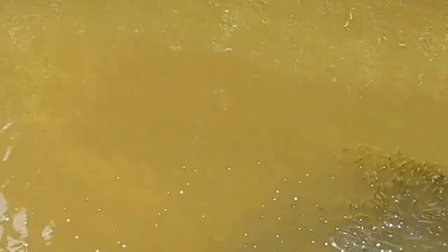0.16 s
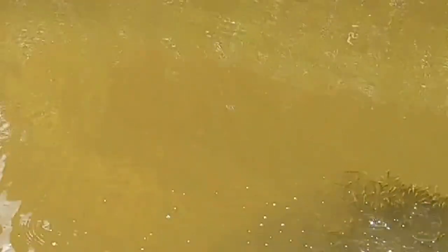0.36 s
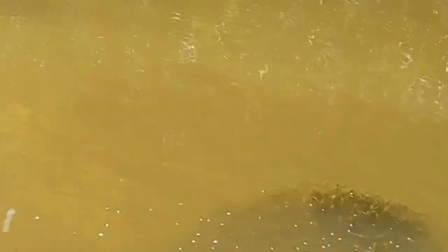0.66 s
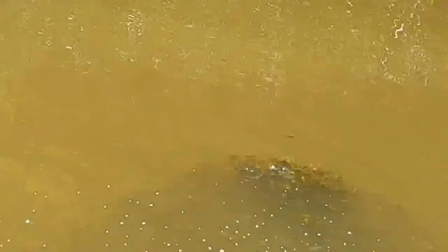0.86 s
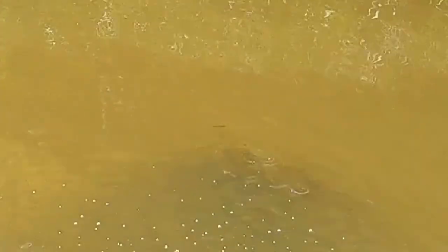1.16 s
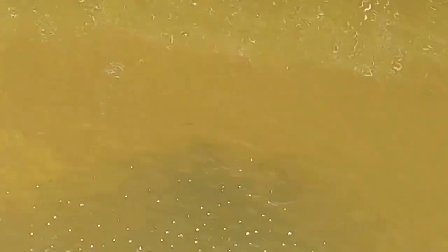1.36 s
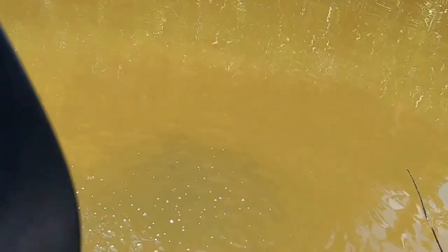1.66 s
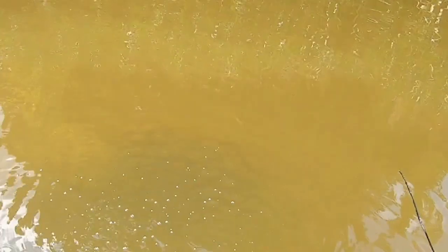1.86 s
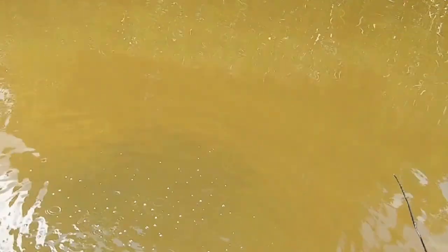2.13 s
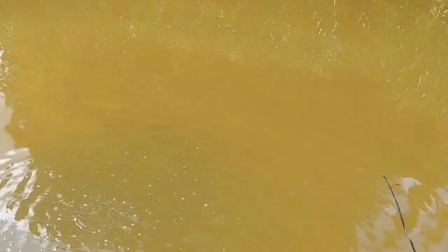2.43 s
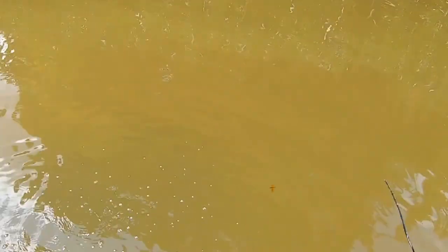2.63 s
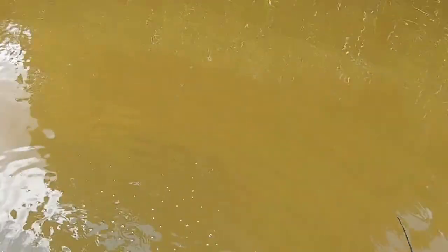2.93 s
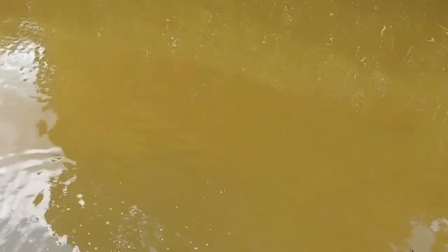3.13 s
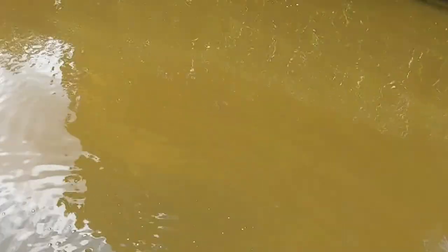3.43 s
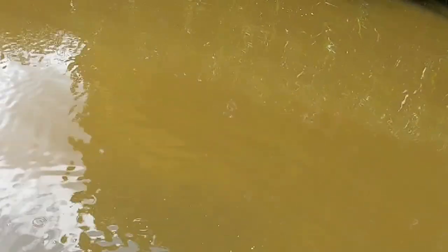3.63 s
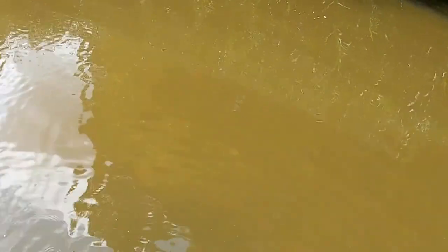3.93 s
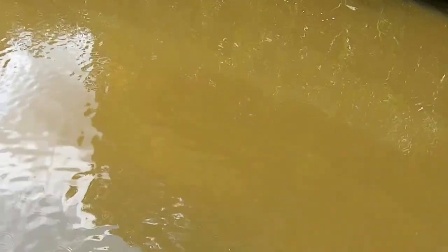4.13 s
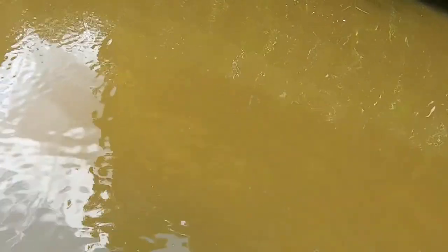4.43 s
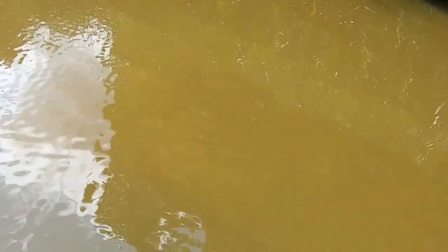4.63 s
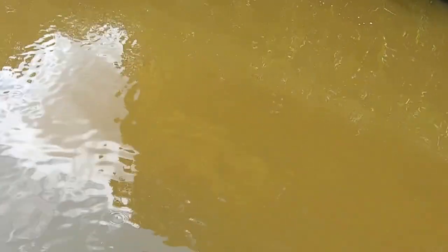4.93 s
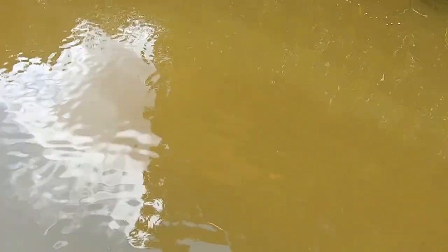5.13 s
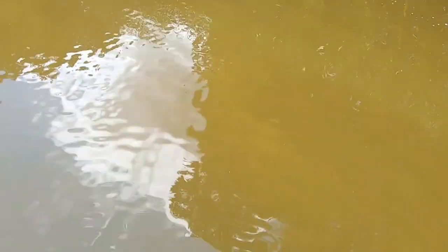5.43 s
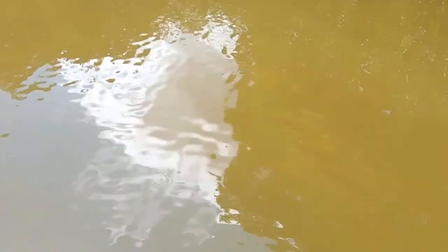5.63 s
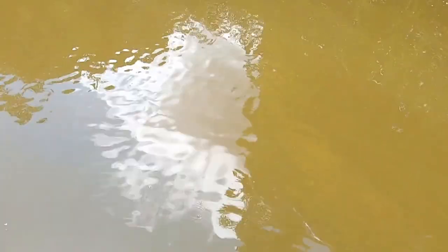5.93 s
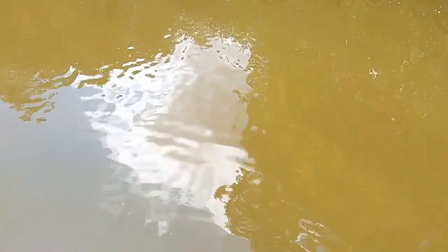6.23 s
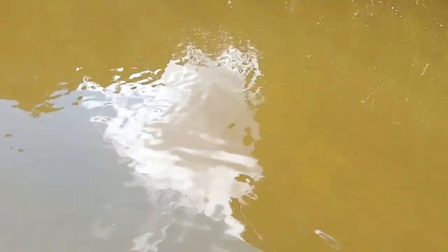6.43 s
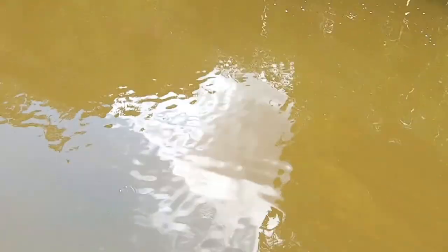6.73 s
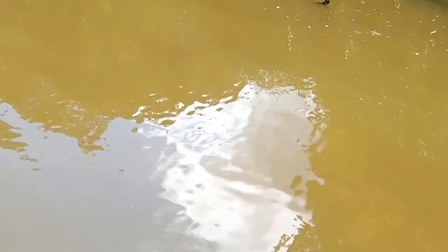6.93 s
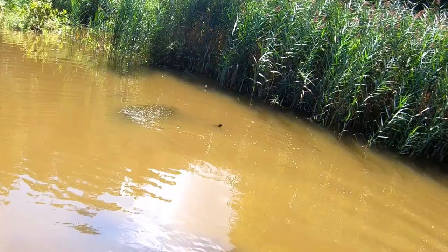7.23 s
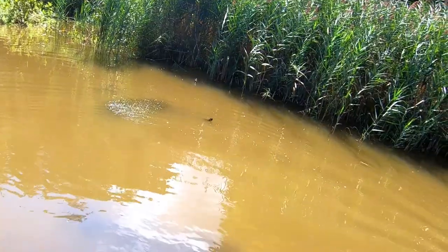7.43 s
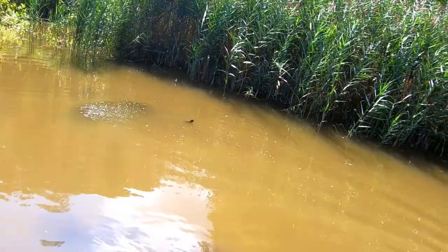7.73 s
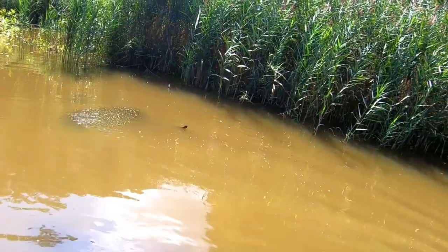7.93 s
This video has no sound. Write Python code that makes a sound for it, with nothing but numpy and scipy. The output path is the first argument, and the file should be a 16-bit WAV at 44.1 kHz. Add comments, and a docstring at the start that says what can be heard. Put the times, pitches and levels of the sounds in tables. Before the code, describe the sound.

Heard from aboard a small aluminium boat on a still pond. Wind rumbles low in the microphones over a steady high hiss and crickets on the right. A paddle knocks the hollow hull, hardest in a cluster around the middle, with a scrape, soft booms and plopping drops. A bright splash of drips follows, then two or three last thumps. At a final cut the insects jump up and the rumble falls away.

```python
"""Drifting boat beside reeds

A small aluminium boat on a still pond, heard in stereo from on board: a paddle knocks and drags on the hull,
whose modes ring; drops and bubbles plop as short rising sines. Shaped noise makes the wind rumbling in
the microphones and their steady high hiss, the lapping, the reeds, the insects and the flexing hull's booms;
pulsed whistles make the crickets on the right. Near the end it cuts to a view of the reeds: the insects are
suddenly louder, the lapping quieter.
"""
import sys
import numpy as np
from scipy import signal
from scipy.io import wavfile
from scipy.ndimage import uniform_filter1d

SR = 44100
rng = np.random.default_rng(int(sys.argv[2]) if len(sys.argv) > 2 else 0)


def log_audio(samples):
    """Write samples as a 16-bit WAV file to the path given in sys.argv[1]."""
    # one column per channel
    frames = np.atleast_2d(samples).T
    # limit to full scale, then quantise
    limited = np.clip(frames, -1, 1)
    pcm = np.round(limited * 32767).astype(np.int16)
    wavfile.write(sys.argv[1], SR, pcm)


N = 355887

CUT_S = 7.135  # cut to the view of the reeds: insects suddenly louder, lapping quieter


def gain_of(db):
    """Amplitude factor of a level in dB."""
    return 10 ** (np.asarray(db) / 20)


def evened(x):
    """The signal at unit rms."""
    return x / np.sqrt(np.mean(x ** 2) + 1e-20)


def read(hz, points, values):
    """Values between points on a log-frequency axis."""
    return np.interp(np.log(hz + 1), np.log(np.asarray(points) + 1), values)


def curve(rows, column):
    """One column of a time table at every sample."""
    rows = np.asarray(rows)
    return np.interp(np.arange(N) / SR, rows[:, 0], rows[:, column])


def add(mix, s, sound):
    """Lay a sound into the mix from s seconds on, cut at the end."""
    part = mix[:, round(s * SR):][:, :sound.shape[1]]
    part += sound[:, :part.shape[1]]


def sides(pan_db):
    """Left and right gains for a left-minus-right difference in dB."""
    return gain_of(np.array([.5 * pan_db, -.5 * pan_db]))


def hiss(table, patchy_db, size=1024, wide=9, long=9):
    """Two-sided noise with patches of wide bins by long frames; the mean of both sides has unit rms."""
    hop, hz = size // 4, np.fft.rfftfreq(size, 1 / SR)
    a, b, c, d, patches = rng.standard_normal((N // hop + 5, len(hz), 5)).T
    patches = uniform_filter1d(patches, int(wide), axis=0)
    patches = evened(uniform_filter1d(patches, int(long), axis=1))
    points, left_db, right_db, like = np.transpose(table)
    # the right side shares part of the left side's noise
    like = np.clip(read(hz, points, like), -1, 1)[:, None]
    left = a + 1j * b
    right = like * left + np.sqrt(1 - like ** 2) * (c + 1j * d)
    shape_db = np.array([read(hz, points, left_db), read(hz, points, right_db)])
    shape_db[:, (hz < points[0]) | (hz > points[-1])] = -120
    spectrum = np.array([left, right]) * gain_of(shape_db[:, :, None] + patchy_db * patches)
    x = signal.istft(spectrum, nperseg=size, noverlap=size - hop)[1][:, :N]
    return x / np.sqrt(np.mean(x.mean(0) ** 2))


# steady high hiss of the microphones, relative: (f/Hz, left level/dB, right level/dB, left-right likeness)
MICROPHONE_SPECTRUM = [(8830, -13, -5, 0.76), (9940, -6, -5, 1), (11100, -10, -11, 1),
                       (12300, -10.5, -7.5, 1), (13600, -6.5, -5, 1), (14000, -8, -15, 1),
                       (15450, -29, -14, 1), (16900, -37, -40, 0.82)]


def microphone_hiss():
    """Steady high noise of the microphones, largely shared by both sides."""
    return gain_of(-70.5) * hiss(MICROPHONE_SPECTRUM, patchy_db=1.0, size=512, wide=11, long=24)


# wind at the microphones, relative spectrum: (f/Hz, left level/dB, right level/dB, left-right likeness)
WIND_SPECTRUM = [(8.05, -12, -5, 0.11), (20.8, -9.5, -3, 0.14), (33.6, -15.5, -1, 0.043),
                 (47.6, -16.5, -10.5, 0.032), (55, -17.5, -19.5, 0.067), (71.6, -45, -37, .05),
                 (120, -68, -50, .05), (201, -85, -70, .05)]
# gusts at the microphones: (t/s, level/dB)
WIND_GUSTS = [(0, -54.5), (.6, -50.5), (1.9, -52), (2.45, -54.5), (3.1, -52), (3.4, -42), (3.56, -42),
              (3.75, -50.5), (4.05, -48), (4.35, -58.5), (5.0, -50.5), (5.9, -45.5), (6.05, -49),
              (7.0, -49.5), (7.2, -59.5), (7.45, -67), (7.6, -67), (8.07, -68)]
WIND_PAN_DB, WIND_SWAY_DB = -1.0, 2.5  # left minus right, and the rms of its wandering


def wind():
    """Low noise, nearly independent at each microphone, swells in gusts and sways between the sides."""
    sway = uniform_filter1d(rng.standard_normal(N), size=9000)
    sway = evened(uniform_filter1d(sway, size=9000))
    gusts = gain_of(curve(WIND_GUSTS, column=1))
    return hiss(WIND_SPECTRUM, patchy_db=1.5, size=4096) * gusts * sides(WIND_PAN_DB + WIND_SWAY_DB * sway)


# reeds beside the boat, relative spectrum: (f/Hz, left level/dB, right level/dB, left-right likeness)
REED_SPECTRUM = [(250, -60, -37, .05), (383, -4.5, -6, 0.48), (545, -9, -3.5, -0.6),
                 (804, -1.5, 2.5, -0.56), (1030, -5.5, -6.5, -0.44), (1370, -8, 0.5, -0.25),
                 (1500, -2.5, -10.5, 0.11), (1660, -8, 1.5, -0.3), (2090, -10.5, -8.5, 0.013),
                 (2660, -9, -10.5, 0.12)]
# rustle of the reeds: (t/s, level/dB)
REED_LEVELS = [(0, -79), (1.4, -75), (2.5, -74.5), (3.15, -68), (3.65, -66.5), (4.1, -71), (4.65, -71),
               (4.75, -81.5), (4.85, -69), (5.03, -65), (5.17, -62.5), (5.35, -71), (5.75, -75), (6.4, -69),
               (6.9, -72), (7.15, -70.5), (7.5, -64.5), (8.07, -70.5)]


def reeds():
    """Patchy middle-band noise rises and falls as the reeds rustle."""
    return hiss(REED_SPECTRUM, patchy_db=3.0) * gain_of(curve(REED_LEVELS, column=1))


# crickets on the right: (t/s, length/s, f/Hz, level/dB before fades and panning, nearness 0-1)
CRICKET_SONGS = [(0, 3.1, 8430, -74, .3), (.7, 1.4, 8010, -68, .2), (2.15, 1.35, 7810, -68, .2),
                 (2.2, 1.4, 8040, -70, .2), (3.85, 1.25, 8400, -67, .75), (5.15, 1.8, 8390, -68, .75),
                 (5.2, 1.0, 8010, -69, .2), (5.8, 1.3, 7800, -69, .2), (6.35, .75, 7160, -69, .02),
                 (7.1, 1.2, 8180, -65, .1)]


def crickets(beat):
    """Narrow whistles: the farther, the fuzzier; the nearer, the cleaner and more strongly pulsed."""
    out = np.zeros((1, N))
    for s, length, hz, level_db, near in CRICKET_SONGS:
        pulses = beat[round(s * SR):][:round(length * SR)]
        near = np.clip(near, 0, 1)
        noise = rng.standard_normal((2, len(pulses)))
        fuzz = evened(signal.lfilter([1], [1, -np.exp(-np.pi * 45.0 / SR)], noise))
        envelope = near + (1 - near) * (fuzz[0] + 1j * fuzz[1])
        whistle = (envelope * np.exp(2j * np.pi * hz * np.arange(len(pulses)) / SR)).real
        song = evened(whistle * np.exp(1.6 * near * pulses)) * signal.windows.tukey(len(pulses), .3)
        add(out, s, gain_of(level_db) * song[None])
    return out * np.array([[.25], [1.75]])  # left, right


# insect chorus in the reeds, relative spectrum: (f/Hz, left level/dB, right level/dB, left-right likeness)
CHORUS_SPECTRUM = [(2060, -24, -28, 0.22), (2680, -26.5, -20.5, 0.95), (3240, -12.5, -14, 0.67),
                   (4430, -18, -15, 0.47), (5950, -14, -8.5, 0.1), (6830, -11, -5.5, 0.69),
                   (6980, -9, -7.5, -0.47), (7410, -16.5, -2, 0.29), (8150, -19, 1.5, -0.42),
                   (8500, -15, -4.5, -0.97), (8660, -34, -8.5, -0.49), (8990, -20, -14, 0.4),
                   (10170, -40.5, -22, 0.89), (12200, -23, -38, 0.67)]
# shrill lower insects, relative spectrum: (f/Hz, left level/dB, right level/dB, left-right likeness)
SHRILL_SPECTRUM = [(2180, -32, -30, 0.28), (2560, -8.5, -9.5, 0.35), (2900, 1, -5.5, 0.27),
                   (2970, -13, -12, 0.67), (3270, -20, -42, 0.4)]
# low insect bands: (t/s, low chorus level/dB against its top before the cut's lift, shrill level/dB)
LOW_INSECTS = [(0, 6, -84), (2.2, -5.5, -85), (3.3, -3, -83), (4.8, -6, -79), (5.2, -2, -74),
               (7.1, -4.5, -73.5), (8.07, -7, -74.5)]
CHORUS_DB, SWELL_DB_PER_S = -61, 0.6965  # the chorus grows as the boat drifts toward the reeds
CUT_DB, CUT_LOW_DB = 3.5, 6.5  # at the cut: lift of the chorus, extra lift of its low band


def insects():
    """A broad chorus that throbs a little, a shrill lower band and crickets."""
    t = np.arange(N) / SR
    after_cut = np.clip((t - CUT_S) / 0.013, 0, 1)
    wobble = evened(uniform_filter1d(rng.standard_normal(N), size=8000))
    beat = np.cos(2 * np.pi * np.cumsum(40.0 + .5 * wobble) / SR)  # about 40 throbs a second
    chorus = hiss(CHORUS_SPECTRUM, patchy_db=1.6, wide=2, long=120)
    low = signal.sosfiltfilt(signal.butter(3, 4300, fs=SR, output="sos"), chorus)
    low_gain = gain_of(curve(LOW_INSECTS, column=1) + CUT_LOW_DB * after_cut)
    chorus = (chorus - low) * (1 + 0.02 * beat) + low * low_gain
    chorus *= gain_of(CHORUS_DB + SWELL_DB_PER_S * t + CUT_DB * after_cut)
    shrill = gain_of(curve(LOW_INSECTS, column=2)) * hiss(SHRILL_SPECTRUM, patchy_db=2.5, size=512)
    return chorus + shrill + crickets(beat)


# hull booms, relative spectrum: (f/Hz, left level/dB, right level/dB, left-right likeness)
BOOM_SPECTRUM = [(35.2, -18, 3, 0.81), (55, -19, 12, 0.34), (80, 9, -7, 0.98), (109, -6, -3.5, 0.98),
                 (153, -31, -15, 0.77)]
# the hull flexes as weight shifts: (peak t/s, level/dB, rise/s, fall/s)
HULL_FLEXES = [(.05, -61.5, .1, 0.46), (2.108, -46.5, 0.11, 0.12), (2.898, -47, 0.36, 0.13),
               (3.55, -43, .06, 0.57), (3.76, -47.5, 0.14, 0.042), (5.168, -46.5, 0.14, 0.41),
               (6.066, -55, .06, 0.047), (6.95, -61.5, 0.47, 0.22)]
FAR_DB = -27  # how far a boom lies under its peak one rise before and one fall after


def rocking():
    """Soft low booms swell and sink, largely shared by both microphones."""
    t = np.arange(N) / SR
    swell = np.zeros(N)
    for s, db, rise, fall in HULL_FLEXES:
        swell += gain_of(db + FAR_DB * np.maximum((s - t) / rise, (t - s) / fall))
    return hiss(BOOM_SPECTRUM, patchy_db=2.0, size=2048) * swell


# small drips run off the paddle: (from t/s, to t/s, top level/dB)
DRIP_RUNS = [(3.76, 4.06, -52), (5.15, 5.24, -54), (5.45, 5.56, -54), (6.83, 6.9, -59)]


def drips():
    """Rows like those of PLOPS, drawn at random: about 130 tiny plips a second."""
    rows = []
    for start, end, level_db in DRIP_RUNS:
        for u in rng.random((int(130 * (end - start)), 4)):
            s = start + u[0] * (end - start)
            rows.append((s, level_db - 20.0 * u[1], 900 * 3.02 ** u[2], -9.0, 25 * u[3]))
    return rows


# drops and bubbles by the boat: (t/s, level/dB, starting f/Hz, left minus right/dB, pitch rise/octaves per s)
PLOPS = [(0.398, -54.5, 1290, -9, 2.4), (.714, -50.5, 1160, 6, 4), (1.295, -53, 747, 1, 3.3),
         (1.949, -57.5, 1630, -27, 6), (2.182, -44, 1790, -14, 43), (2.242, -41.5, 652, -9, 15.5),
         (2.264, -52, 846, -14, 52), (3.734, -41.5, 1125, -16, 10), (3.745, -50, 940, -31, 13),
         (3.742, -48, 1960, -5, 20), (5.089, -43, 1290, 5, 3), (4.15, -55, 905, -5, 22),
         (5.2, -45.5, 3200, -3, 20), (5.444, -43.5, 3700, -8, 30), (5.494, -54, 796, -2, 4),
         (5.513, -32.5, 3180, -3, 6.2), (5.516, -49, 920, -3, 5.6), (5.519, -41, 4500, -4, 25),
         (5.528, -47, 2040, 0, 17), (5.532, -50, 1180, 5, 4), (5.539, -46, 800, -4, 3.2),
         (5.837, -54.5, 1830, -17, 8), (6.066, -46.5, 1165, 8, 14), (6.864, -60.5, 745, -23, 3.7),
         (6.927, -51.5, 1090, -6, 30), (7.617, -48, 2020, -17, 11.5), (7.622, -49, 1580, -19, 6.9)]
BUBBLE_CYCLES = 36  # cycles of the starting pitch until a bubble has died by 60 dB
SPLAT_DB, SPLAT_T60_S = -17.0, .025  # the fizz of a landing drop, against its bubble


def bubbles():
    """Short sines climb in pitch as each bubble nears the surface, each with a tick of spray."""
    out, t = np.zeros((2, N)), np.arange(SR // 8) / SR
    for s, level_db, hz, pan_db, climb in PLOPS + drips():
        turns = np.cumsum(hz * 2 ** (climb * t)) / SR
        decay = gain_of(level_db - 60 * t * hz / BUBBLE_CYCLES)
        plop = decay * (1 - np.exp(-t * hz / 2.84)) * np.sin(2 * np.pi * turns)
        band = signal.butter(2, [.7 * hz, min(1.7 * hz, 6000)], "band", fs=SR, output="sos")
        spray = evened(signal.sosfilt(band, rng.standard_normal(len(t))))
        splat_decay = gain_of(level_db + SPLAT_DB - 60 * t / SPLAT_T60_S)
        plop += splat_decay * (1 - np.exp(-t / 0.00087)) * spray
        add(out, s, sides(pan_db)[:, None] * plop)
    return out


# a larger air pocket: (t/s, length/s, starting f/Hz, rise/octaves, starting level/dB)
AIR_POCKET = (5.535, .105, 620, 1.6, -66)


def gurgle():
    """A larger air pocket gurgles upward, fading by 10 dB for each octave it climbs."""
    out = np.zeros((2, N))
    s, length, hz, octaves, level_db = AIR_POCKET
    u = np.arange(0, length, 1 / SR) / length
    climb = octaves * u ** 2.1
    tone = np.sin(2 * np.pi * np.cumsum(hz * 2 ** climb) / SR)
    tone *= np.sqrt(2) * gain_of(level_db - 10.0 * climb) * signal.windows.tukey(len(u), .2)
    add(out, s, sides(-5.0)[:, None] * tone)
    return out


# hull modes: (f/Hz, relative level/dB, t60/s)
HULL_MODES = [(59.4, -12, 0.34), (85.9, -4, 0.45), (131.4, 1, 0.71), (152.4, 2, 0.43), (183, 4, 0.34),
              (209.5, 2, 0.45), (246.2, 1.5, 0.45), (273.7, -1.5, 0.46), (302.6, 1, 0.41), (343, -4, 0.42),
              (372, -9.5, 0.9), (416.4, -8.5, 0.38), (425.7, 2.5, 0.32), (463.7, -2.5, 0.24),
              (516, -4.5, 0.53), (583.5, -2.5, 0.3), (643.3, 1, 0.27), (685, 0, 0.29), (757, 3, 0.21),
              (766, -7.5, 0.45), (852, 0, 0.34), (955, -3, 0.34), (1020, -5.5, 0.32)]
# crowded upper modes of the panels: (f/Hz, t60/s, relative level/dB)
PANEL_MODES = [(900, 0.27, -6.5), (1250, 0.24, -4.5), (1900, 0.17, -4.5), (2500, 0.14, -7),
               (3100, 0.13, -7), (5500, 0.051, -9.5)]


def hull_modes():
    """The listed modes with two slightly detuned neighbours each, then crowded panel modes: Hz, dB, t60."""
    hz, db, t60 = np.transpose(HULL_MODES)
    points, panel_t60, panel_db = np.transpose(PANEL_MODES)
    upper = np.geomspace(1080, 5500, num=50) * rng.uniform(1.0, 1.015, size=50)
    all_hz = np.r_[hz, hz * 1.035, hz * .972, upper]
    all_db = np.r_[db - 1.0, db - 6.0, db - 6.5, read(upper, points, panel_db)]
    all_t60 = np.r_[t60, t60 * .8, t60 * .7, read(upper, points, panel_t60)]
    return all_hz, all_db, all_t60


# corner pitches of a blow's colour: (f/Hz)
COLOUR_HZ = [110, 250, 530, 1130, 2500]
# balance of the hull at the microphones: (f/Hz, left minus right/dB)
HULL_BALANCE = [(60, -3.5), (150, 0.5), (380, -1), (950, -7.5), (2380, -13), (5980, -3), (15000, -2.0)]


def ring(modes, colour_db, length, travel_s, spot_hz, spread_db=2.2):
    """One blow: bending waves carry the treble first and the bass later; each spot favours other modes."""
    hz, db, t60 = (c[:, None] for c in modes)
    # wave speed grows as the root of pitch; travel_s holds at 250 Hz
    arrival = abs(travel_s) * np.sqrt(250 / hz)
    t = np.maximum(np.arange(int(SR * length / 2)) / SR - arrival, 0)
    luck = rng.standard_normal((3, len(hz), 1))
    rise = 1 - np.exp(-t / (0.6 / hz + 0.00035))
    dull_db = -7.0 * np.maximum(np.log2(hz / COLOUR_HZ[-1]), 0)
    spot_db = 5.2 * np.exp(-(np.log2(hz / spot_hz) / 0.18) ** 2)
    start_db = db + read(hz, COLOUR_HZ, colour_db) + dull_db + spot_db + spread_db * luck[0]
    size = gain_of(start_db - 60 * t / (t60 * length)) * rise
    # low modes start together as one thump
    phase = 2 * np.pi * hz * t + luck[1] * np.minimum(hz / 330, 3.0)
    # the left microphone is further off and hears other parts of the panels
    lag = 2 * np.pi * hz * 0.00023 + luck[2] * np.minimum((hz / 720) ** 2, 1.4)
    pan = sides(read(hz, *np.transpose(HULL_BALANCE)))
    left = (pan[0] * size * np.sin(phase - lag)).sum(0)
    right = (pan[1] * size * np.sin(phase)).sum(0)
    return np.array([left, right])


# the paddle slides along the hull: (t/s, length/s, relative level/dB, brightness/dB)
PADDLE_DRAGS = [(1.922, 0.28, -58, -9), (2.682, 0.24, -59, -8), (3.341, 0.28, -40, -14),
                (3.718, 0.22, -56.5, 2.5), (4.137, .07, -62, -8), (5.2, 0.12, -57, -9)]
DRAG_BITE_S, DRAG_FADE_DB, SLIPS_PER_S = 0.058, -18, 520  # fade over each drag; mean slip rate


def drags(modes):
    """Uneven little slips, which bite and then fade, ring the low and the high modes of the hull."""
    out = np.zeros((2, N))
    low = ring(modes, [1.5, 2.5, -1.0, -13.5, -60.], 0.41, 0.0014, 530)
    high = ring(modes, [-60., -50.0, -1.5, 4.0, -5.0], 0.083, 0.00095, 1470)
    for s, length, level_db, bright_db in PADDLE_DRAGS:
        t = np.arange(0, length, 1 / SR)
        slips = rng.standard_normal(len(t)) * (rng.random(len(t)) < SLIPS_PER_S / SR)
        slips *= np.sqrt(SR / SLIPS_PER_S)
        slips *= gain_of(level_db + DRAG_FADE_DB * t / length) * np.minimum(t / DRAG_BITE_S, 1)
        for body, lift in ((low, 1), (high, gain_of(bright_db))):
            unit_body = body / np.linalg.norm(body.mean(0))
            add(out, s, signal.fftconvolve((slips * lift)[None], unit_body, axes=1))
    return out


# blows on the hull: (t/s, relative level/dB, bass lift/dB, middle lift/dB, treble slope/dB per octave,
# ring length factor, favoured f/Hz, travel time at 250 Hz/s)
HULL_BLOWS = [(.71, -79.5, 4, 2, 4, 1.1, 1140, 0.0019), (.762, -74.5, -1, -10, 6, 0.86, 166, 0.0029),
              (1.226, -66, -17, -0.5, -0.5, 0.18, 1110, 0.00087),
              (1.41, -37.5, -3.5, 0.5, -10.5, 0.68, 228, 0.0068),
              (1.469, -49.5, 7, -17.5, -6, 1.18, 127, .006), (1.7, -49, 2.5, 1, -15, 0.79, 159, 0.0066),
              (1.805, -58, 5.5, -8, -16, 0.77, 131, .007), (2.496, -63, 7.5, 5, -25, 0.88, 437, 0.0037),
              (2.554, -62, 10.5, -13, -9, 0.86, 150, 0.0051),
              (2.804, -68.5, 11.5, -8.5, 1.5, 1.1, 250, 0.0057),
              (3.345, -51.5, -9, 2.5, -6, 0.73, 368, 0.0032), (3.499, -34, -1, -9, -2, 0.71, 150, 0.002),
              (3.546, -35, 1, 5.5, -9.5, 0.54, 453, 0.0089),
              (3.604, -37.5, -7, -5.5, -22, 0.62, 201, 0.0013), (3.624, -49, 4, 0, -17, 1.3, 235, .002),
              (3.739, -51.5, 5, 1, -5, 0.25, 210, 0.0041), (4.138, -61, -33, -4.5, -5, 0.72, 224, 0.0029),
              (5.108, -43, -11, -5, -16, 0.69, 279, .005), (5.163, -53, -3, -21, 0, 0.56, 219, 0.0022),
              (5.199, -57.5, -2, 1.5, -11, 0.4, 550, 0.0022), (5.435, -62, -11, -31, 2, 0.79, 210, 0.0059),
              (6.474, -42.5, -11, -1, -3, 0.67, 278, 0.0053), (6.52, -52, -20, -8, -10, 1.53, 205, 0.0069),
              (6.604, -46.5, -15, -1.5, -5, 0.67, 417, .005)]


def blows(modes):
    """Paddle and feet knock the hull; each contact sets its own bass, middle and treble slope."""
    out = np.zeros((2, N))
    octaves = np.log2(np.array(COLOUR_HZ[3:]) / COLOUR_HZ[2])
    for s, level_db, bass_db, middle_db, slope_db, length, spot_hz, travel_s in HULL_BLOWS:
        colour_db = [bass_db, 0, middle_db, *(middle_db + slope_db * octaves)]
        add(out, s - .003, gain_of(level_db) * ring(modes, colour_db, length, travel_s, spot_hz))
    return out


CALM_DB, SLOSH_DB = -69.5, -23.5  # lapping at rest; extra after a blow, against the blow's level
SLOSH_RISE_S, SLOSH_T60_S = 0.068, 1.6
CUT_LAP_DB = -2.5  # the lapping is quieter after the cut


def slosh():
    """Gain of the lapping: calm, stirred up by every blow and slowly settling."""
    t, power = np.arange(N) / SR, gain_of(2 * CALM_DB)
    for s, level_db, *_ in HULL_BLOWS:
        since = np.maximum(t - s, 0)
        settling = gain_of(2 * (level_db + SLOSH_DB - 60 * since / SLOSH_T60_S))
        power = power + settling * (1 - np.exp(-since / SLOSH_RISE_S))
    return np.sqrt(power) * gain_of(CUT_LAP_DB * (t > CUT_S))


# water under the hull, relative spectrum: (f/Hz, left level/dB, right level/dB, left-right likeness)
LAP_SPECTRUM = [(60.4, 2, -18, .1), (115.6, -13.5, 0, 0.12), (176.4, 6.5, 2, 0.08),
                (283, -9.5, -5.5, 0.075), (360, -14.5, -12, 0.063), (612, -21, -66, .05)]


def lapping():
    """Patchy low noise of water under the hull follows the slosh."""
    return hiss(LAP_SPECTRUM, patchy_db=4.0, size=2048) * slosh()


def scene():
    """Everything at the boat, from the microphones' own hiss to the blows on the hull."""
    modes = hull_modes()
    background = microphone_hiss() + wind() + reeds() + insects()
    water = lapping() + bubbles() + gurgle()
    return background + water + rocking() + drags(modes) + blows(modes)


EDGE_HZ = 15640


def record(dry):
    """The band limit of the camera: a steep low-pass."""
    low_pass = signal.firwin(511, EDGE_HZ, window=("kaiser", 9), fs=SR)
    return signal.oaconvolve(dry, low_pass[None], "same")


dry = scene()
out = record(dry)
log_audio(out)
```